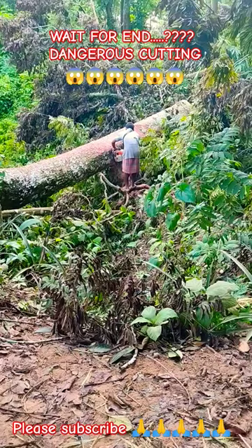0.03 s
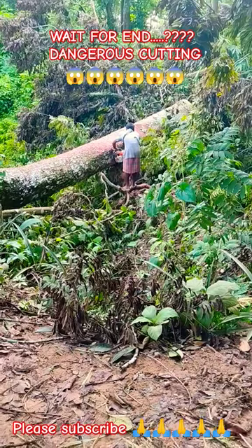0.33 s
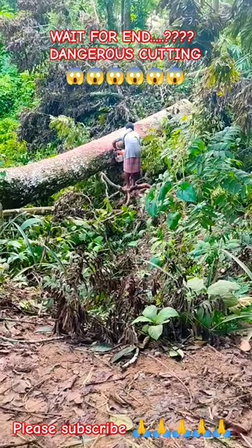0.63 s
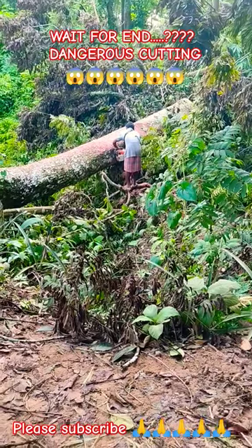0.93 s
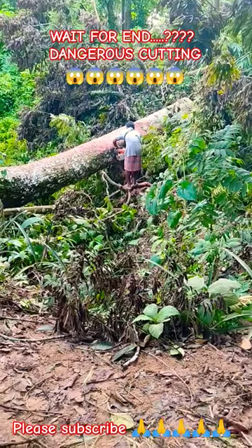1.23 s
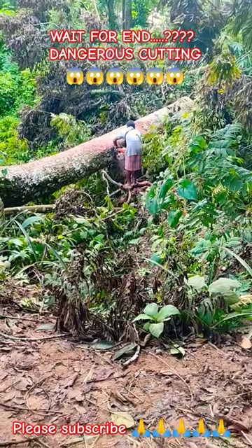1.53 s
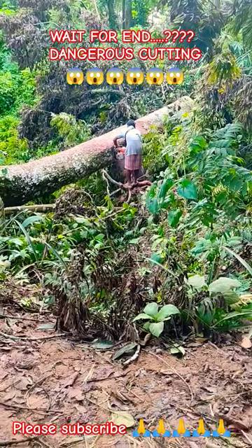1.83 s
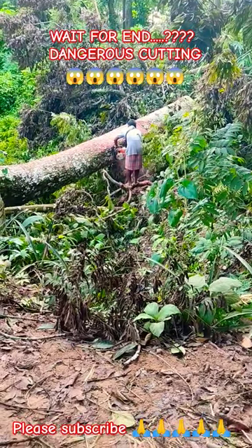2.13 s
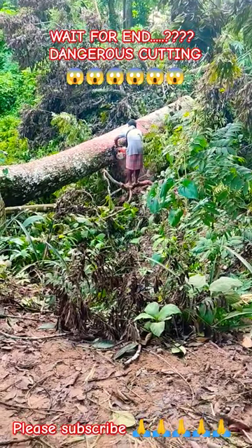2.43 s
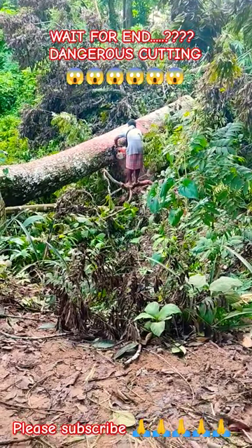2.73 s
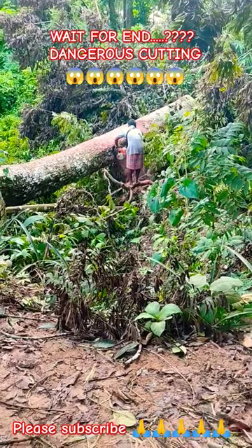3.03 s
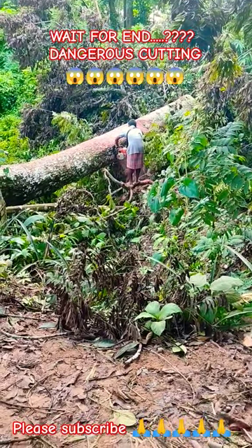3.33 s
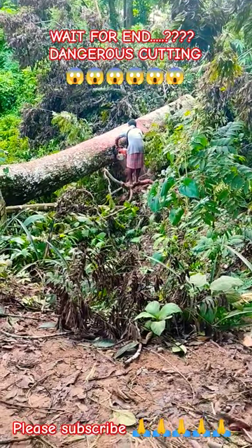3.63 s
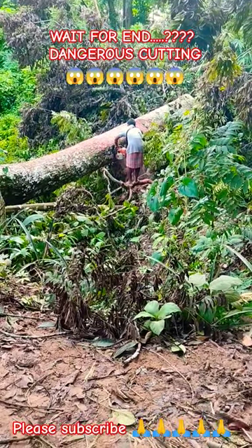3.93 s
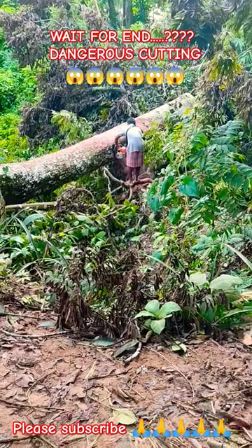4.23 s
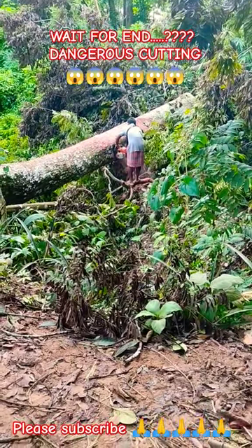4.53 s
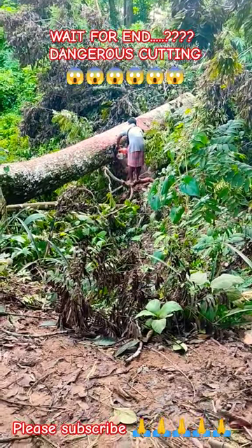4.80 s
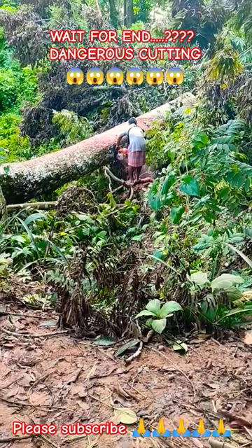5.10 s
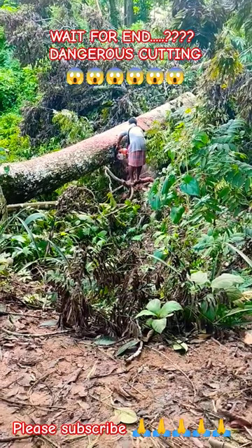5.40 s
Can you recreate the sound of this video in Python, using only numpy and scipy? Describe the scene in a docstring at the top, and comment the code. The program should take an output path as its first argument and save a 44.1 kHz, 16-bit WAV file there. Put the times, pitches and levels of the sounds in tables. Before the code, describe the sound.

A petrol chainsaw some metres away rises from a sputtering idle to a high, rasping drone as it saws through wood.

```python
"""Chainsaw cutting a fallen trunk

A two-stroke chainsaw works some metres away in thick greenery. It idles unevenly, revs up
and sinks into the wood, its speed sagging and recovering with the load. Each firing of the
engine sends out a pulse of exhaust that rings the muffler, outlet and casing. The loose clutch
jingles at idle, the chain whines, chips and cooling air hiss, and a faint rumble lies beneath."""
import sys
import numpy as np
from scipy import signal
from scipy.fft import rfft, irfft, next_fast_len
from scipy.io import wavfile
from scipy.ndimage import uniform_filter1d

SR = 44100
rng = np.random.default_rng(int(sys.argv[2]) if len(sys.argv) > 2 else 0)


def generate_wav(sig):
    """Save sig (samples, or channels by samples) to the path in sys.argv[1] as 16-bit PCM at SR."""
    pcm = np.round(np.clip(np.atleast_2d(sig).T, -1, 1) * 32767).astype(np.int16)
    wavfile.write(sys.argv[1], SR, pcm)


N = 245195
TIME = np.arange(N) / SR
FFT_SIZE = next_fast_len(N + SR // 4)
FREQ = np.maximum(np.arange(FFT_SIZE // 2 + 1) * SR / FFT_SIZE, 1)
SIDES = np.array([[1], [-1]])   # left ear, right ear; "pan" is left level minus right level

# how fast the engine fires, once per turn: t/s, rate/Hz
ENGINE_SPEED = [(0.26, 54.5), (0.63, 51.8), (0.76, 70.8), (0.88, 77.1), (1.28, 83.7), (1.38, 107.2),
                (1.54, 126.3), (1.89, 152.7), (2.02, 149.2), (2.22, 130.2), (2.31, 131.6), (2.59, 125.5),
                (2.73, 131.2), (2.94, 133.4), (3.19, 141.9), (3.44, 139.1), (3.88, 121.3), (4.04, 119.4),
                (4.21, 126.0), (4.46, 127.0), (4.75, 125.1), (5.05, 136.9), (5.25, 141.2), (5.49, 133.6)]
# how hard the saw works: t/s, throttle/0-1, bite into the wood/0-1
WORKLOAD = [(0.14, 0, 0.02), (0.64, 0.22, 0.65), (0.8, 0.22, 0.3), (1.22, 0.47, 0.26), (1.4, 0.6, 0.32),
            (1.65, 0.82, 0.17), (2.15, 0.73, 0.08), (2.62, 0.73, 0), (2.75, 0.87, 0), (3.55, 0.93, 0.1),
            (3.72, 0.78, 0.3), (4.2, 0.82, 0.62), (4.8, 0.8, 1), (4.88, 0.98, 0.12), (5.56, 1, 0.12)]
# moments when the chain snatches and rattles louder: t/s, half length/s, boost/dB
CHAIN_SNATCHES = [(0.35, 0.087, 4), (0.695, 0.035, 2.5), (1.382, 0.15, 2), (2.034, 0.12, 2.5),
                  (3.226, 0.048, 1.5)]
# tone colour of the rumbling air: f/Hz, level/dB
RUMBLE_COLOUR = [(20, -4), (45, -25), (90, 0.5), (200, -3.5), (600, -20), (2000, -90)]
# tone colour of the chain and chip hiss: f/Hz, level/dB
HISS_COLOUR = [(120, -5), (300, -5.5), (600, -2), (1000, 2), (1150, 1), (1650, 3), (2500, 4.5), (3600, 3),
               (5300, 1), (7500, 0), (9800, -0.5), (11500, -1.5), (13300, -7), (15500, -10)]
# how alike the hiss is in both ears: f/Hz, likeness (1 or more: same, -1 or less: opposite)
HISS_LIKENESS = [(120, -1.9), (600, 1.4), (1200, -0.2), (2200, 0.1), (4000, -0.42), (8000, -0.14),
                 (14000, 0.1)]
# which side the hiss leans to: f/Hz, pan/dB
HISS_BALANCE = [(120, 8), (450, 3), (900, 17), (1450, -12), (2250, 8.5), (3300, -3), (4500, 3.5),
                (6000, -3.5), (9000, 4.5), (14000, -1.5)]
# ringing of the chain and its guide bar: f/Hz, width/Hz, level against the hiss/dB, pan/dB
BAR_RINGS = [(4430, 770, -2, -9), (6190, 87, -0.5, 12), (6810, 190, -1, -13), (7526, 51, 4, -20),
             (7950, 58, -1, -25), (9700, 340, -0.5, 16), (10400, 91, -6.5, 18)]
# tones of the driven chain: multiple of the firing rate, racing level/dB, cutting level/dB, pan/dB
WHINE_TONES = [(8, -34, -33, 0), (9, -38, -36, 3), (11, -42, -28, -5), (14, -30.5, -50, -5),
               (18, -48, -25, 8)]
# ringing of the loose clutch and chain: f/Hz, width/Hz, level/dB, pan/dB
CLUTCH_RINGS = [(2195, 70, -14, 7), (2254, 45, 3, 29), (3100, 35, -15, -4)]
# ringing of the muffler (low), its outlet (middle) and the casing (high):
# f/Hz, width/Hz, idling level/dB, racing level/dB, cutting level/dB, pan/dB, left ear's lead/rad
MUFFLER_RINGS = [(140, 32, -7, -41, -32, 15, 0.76), (162, 23, -9.5, 1, -20, -13, 0.96),
                 (209.7, 7.9, 11.5, 4.5, -5, -3, 0.067), (256.4, 20, 3, -55, -24, -10, 0.13),
                 (359.8, 26.8, 0.5, 7, 8, -21, 0.7), (456.8, 40, 1.5, 5, 12, 14, -1.32),
                 (546, 28.5, -3, 3, 14.5, 0.5, -0.37), (624.7, 19.5, -29, 3, 2.5, 7, 0.45),
                 (723.6, 10.7, -10, 10.5, 11, 6, 0.57)]
OUTLET_RINGS = [(809, 23, 12, 9, 5, 1, 0.4), (843, 5.9, -8, 9, -5, -5, .5),
                (934.8, 14.2, 28.5, 19.5, 15, 1, 1.04), (987, 58, -12, 4, 5, 3, 0.86),
                (1046, 11, -35, 1, -45, 5, 1.1)]
CASING_RINGS = [(1247, 66, -22, 2, -21, 12.5, 0), (1317, 42, 1.5, -2.5, 16.5, 2.5, -1),
                (1427, 41, -14, -31, 8.5, -14, 4.5), (1410, 460, -36, 1.5, -29, -1.5, 2.2),
                (1630, 40, -24, -32, -17, 9, 3), (1808, 58, -13, 0, 12.5, -2.5, 2.5),
                (1889, 61, -12, 4, 1, -10, 1.45), (2135, 47, -3, -16, 9, 2, -1),
                (2253, 40.5, 3, 0, 10, 15.5, 1.74), (2330, 10, 12, -11, -14, 0.5, 4),
                (2650, 43, -28, -19, -22, 0, 6), (2786, 150, -16, -8.5, -21, -9, 1.2),
                (3080, 40, -6, -21, 5, 17, 1)]
# firing hum, muffler drone and outlet bark swell where a multiple of the firing rate meets a ring:
# rate/Hz, level/dB
HUM_LEVELS = [(53, -49), (60, -29), (74, -26.5), (85, -17), (105, -23), (122, -19), (135, -23), (152, -21)]
DRONE_LEVELS = [(54, -26.5), (64, -25.5), (72, -20.5), (81, -25.5), (88, -21), (104, -23.3), (120, -24.5),
                (127, -26), (134, -31.5), (141, -27), (152, -26.5)]
BARK_LEVELS = [(54, -40), (68, -39), (77.7, -22.5), (81, -32.5), (106, -19.5), (120, -22), (126.5, -26.5),
               (132, -21.5), (147, -30.5), (153, -26)]
# the hum's upper octave: rate/Hz, level against the lowest tone/dB
OCTAVE_LEVELS = [(54, -4), (66, -6), (82, -3.5), (100, -25), (120, -16.5), (130, -58), (155, -51)]


def from_db(db):
    """Turn decibels into a factor to multiply by."""
    return 10 ** (np.asarray(db) / 20)


def unit_power(x):
    """Scale a signal to an average power of 1."""
    return x / np.sqrt(np.mean(x ** 2) + 1e-20)


def over_time(table):
    """Read each column of a time table at every sample."""
    times, *columns = np.transpose(table)
    return [np.interp(TIME, times, column) for column in columns]


def over_hz(table):
    """Read a frequency table at every frequency."""
    hz, value = np.transpose(table)
    return np.interp(np.log(FREQ), np.log(hz), value)


def at_speed(table, speed):
    """Read a firing-rate table at the engine's speed."""
    return np.interp(speed, *np.transpose(table))


def filtered(x, response):
    """Strengthen or weaken each frequency of a signal."""
    return irfft(rfft(x, FFT_SIZE) * response, FFT_SIZE)[..., :N]


def resonance(hz, width):
    """The response of something that rings at one pitch, 1 at its peak."""
    return 1 / (1 + 1j * hz / width * (FREQ / hz - hz / FREQ))


def drift(rate_hz):
    """A slow random wobble, about 1 in size."""
    return unit_power(filtered(rng.standard_normal(FFT_SIZE), 1 / (1 + 1j * FREQ / rate_hz) ** 2))


def evened(x):
    """Hold the level of a stereo sound near 1 from moment to moment."""
    power = np.mean(x, axis=0) ** 2
    for _ in range(2):
        power = uniform_filter1d(power, size=2400)
    return x / np.sqrt(np.abs(power) + 1e-12)


def roughness(speed, idle_hz=52.5, hard_rev_hz_per_s=220):
    """How unevenly the fuel burns, 0-1: worst at idle and while revving up, steadiest under load."""
    _, bite = over_time(WORKLOAD)
    idling = np.exp(-np.maximum(speed - idle_hz, 0) / 7.3)
    speed_gain = uniform_filter1d(np.gradient(speed) * SR, size=3000)
    revving = np.clip(speed_gain / hard_rev_hz_per_s, 0, 1)
    return np.clip(0.21 * (1 - 0.58 * bite) + 0.73 * idling + 0.17 * revving ** 2, 0, 1)


def puff(turns, decay_turns):
    """Gas flow in each turn: the exhaust port opens at once and the pressure dies away."""
    return unit_power(np.exp(-(turns % 1) / decay_turns))


def firings(turns, spread_db):
    """One blow per engine turn, each with its own random strength."""
    at = np.flatnonzero(np.diff(np.floor(turns)) > 0)
    late = (np.ceil(turns[at]) - turns[at]) / (turns[at + 1] - turns[at])   # part of a sample
    chance = np.clip(rng.standard_normal(N)[:len(at)], -2, 1.5)
    strength = from_db(np.broadcast_to(spread_db, N)[at] * chance)
    pulses = np.zeros(N)
    pulses[at], pulses[at + 1] = strength * (1 - late), strength * late
    return unit_power(pulses)


def chain_running(speed, grip_hz=91, spread_hz=11):
    """How firmly the clutch drives the chain, 0-1: it grips as the engine speeds up."""
    return 0.5 + 0.5 * np.tanh((speed - grip_hz) / spread_hz)


def snatches_db():
    """Each snatch of the chain is a short, smooth swell in level."""
    return sum(db * np.exp(-((TIME - t) / length) ** 2) for t, length, db in CHAIN_SNATCHES)


def air_rumble(level_db=-44):
    """Moving air makes a faint low rumble, nearly the same in both ears."""
    noise = rng.standard_normal(N) + 0.14 * rng.standard_normal((2, N))
    return from_db(level_db) * unit_power(filtered(noise, from_db(over_hz(RUMBLE_COLOUR))))


def foliage_echoes(x, echo_db=-19, count=12):
    """Leaves, trunk and ground send back faint, quick echoes, different ones to each ear."""
    out = x.copy()
    for ear in range(2):
        for lag in (rng.uniform(0.002, 0.028, count) * SR).astype(int):
            out[ear, lag:] += rng.choice([-1, 1]) * from_db(echo_db) * x[ear, :-lag]
    return out / np.sqrt(1 + count * from_db(echo_db) ** 2)


def trunk_echo(x, delay_s=0.0029, share=0.46):
    """Bounces between saw and trunk smear each pulse in time without changing its tone colour."""
    delay = np.exp(-2j * np.pi * FREQ * delay_s)
    return filtered(x, (share + delay) / (1 + share * delay))


def clutch_jingle(turns):
    """Every turn knocks the loose clutch, now hard, now barely; the throttle draws it tight."""
    throttle, _ = over_time(WORKLOAD)
    knocks = firings(turns, spread_db=6)
    metal = sum(from_db(db + SIDES * pan / 2) * resonance(hz, width)
                for hz, width, db, pan in CLUTCH_RINGS)
    return from_db(-31) * (1 - throttle) ** 2 * unit_power(filtered(knocks, metal))


def chain_whine(turns, speed, flutter_depth=0.4, flutter_hz=9, throttle_rise_db=22):
    """The chain runs in step with the engine; its tones flutter, and their mix shifts as it bites."""
    throttle, bite = over_time(WORKLOAD)
    whine = 0
    for multiple, race_db, cut_db, pan in WHINE_TONES:
        flutter = 1 + flutter_depth * (drift(flutter_hz) + 1j * drift(flutter_hz))
        tone = np.real(flutter * np.exp(2j * np.pi * multiple * turns))
        strength = from_db(race_db) * (1 - bite) + from_db(cut_db) * bite
        whine = whine + tone * strength * from_db(SIDES * pan / 2)
    return whine * chain_running(speed) * from_db(throttle_rise_db * (throttle - 1.5))


def chain_hiss(turns, speed, rough, throb=0.32, flicker_db=0.95, wander_db=2.0):
    """Countless tiny hits of teeth and chips hiss, ring the bar and surge with each firing."""
    shared, opposed = rng.standard_normal((2, N))
    alike = np.clip(over_hz(HISS_LIKENESS), -1, 1)
    colour = from_db(over_hz(HISS_COLOUR) + SIDES * over_hz(HISS_BALANCE) / 2)
    hiss = filtered(shared, colour * np.sqrt(1 + alike))
    hiss += SIDES * filtered(opposed, colour * np.sqrt(1 - alike))
    for hz, width, db, pan in BAR_RINGS:
        # the rings come and go as the chain shifts
        taps = rng.standard_normal(N) * from_db(wander_db * drift(2.6))
        hiss += from_db(db + SIDES * pan / 2) * filtered(taps, resonance(hz, width))
    treble = filtered(hiss.mean(axis=0), (FREQ > 3000) & (FREQ < 12000))
    treble_db = -34 + 4.5 * chain_running(speed) + snatches_db() + flicker_db * drift(24)
    surge = 1 + throb * rough * (puff(turns, decay_turns=0.48) - 1)
    return hiss / np.std(treble) * surge * from_db(treble_db)


def ringing_part(drive, rings, band_hz):
    """Pulses ring one part of the saw; the load changes its mix of pitches, at a steady level."""
    throttle, bite = over_time(WORKLOAD)
    shares = np.array([1 - throttle, throttle * (1 - bite), throttle * bite])   # idle, race, cut
    drives = rfft(drive * shares, FFT_SIZE)
    spectrum = 0
    for hz, width, idle_db, race_db, cut_db, pan, lead in rings:
        ears = from_db(SIDES * pan / 2) * np.exp(0.5j * SIDES * lead)
        mixed_drive = from_db([idle_db, race_db, cut_db]) @ drives
        spectrum = spectrum + ears * mixed_drive * resonance(hz, width)
    band = signal.butter(4, band_hz, "band", fs=SR, output="sos")
    return evened(signal.sosfilt(band, irfft(spectrum, FFT_SIZE)[:, :N]))


def firing_hum(turns, speed):
    """The smooth part of the pulsing gas flow hums at the firing rate and an octave above."""
    lowest = np.cos(2 * np.pi * (turns + 0.28) + 0.059 * SIDES)
    octave = from_db(at_speed(OCTAVE_LEVELS, speed)) * np.cos(2 * np.pi * (2 * turns + 0.35))
    return np.sqrt(2) * (lowest + octave) * from_db(at_speed(HUM_LEVELS, speed) - 0.5 * SIDES)


def exhaust(turns, speed, rough, usual_throttle=0.85, flicker_db=1.77):
    """Over the hum, pulses and swirling gas make the muffler drone, outlet bark and casing rasp."""
    throttle, bite = over_time(WORKLOAD)
    running = chain_running(speed)
    pulses = trunk_echo(firings(turns, spread_db=2.2 * rough))
    gas = puff(turns, decay_turns=0.41) * rng.standard_normal(N)
    drone = ringing_part(pulses + 0.48 * rough * gas, MUFFLER_RINGS, band_hz=(126, 729))
    bark = ringing_part(pulses + 1.15 * rough * gas, OUTLET_RINGS, band_hz=(694, 1059))
    rasp = ringing_part(pulses + (0.15 + 1.9 * rough) * gas, CASING_RINGS, band_hz=(1130, 3350))
    lows = firing_hum(turns, speed) + drone * from_db(at_speed(DRONE_LEVELS, speed))
    # with the chain running, more throttle shifts power from the lows to the bark
    push = running * (throttle - usual_throttle)
    bark_db = at_speed(BARK_LEVELS, speed) + 19 * push
    rasp_db = -34.5 + 4 * running + 2 * bite + 0.17 * snatches_db() + flicker_db * drift(8.3)
    return lows * from_db(-3 * push) + bark * from_db(bark_db) + rasp * from_db(rasp_db)


def scene():
    """The engine's turning drives every part of the saw; it wavers when the fuel burns unevenly."""
    speed, = over_time(ENGINE_SPEED)
    rough = roughness(speed)
    turns = np.cumsum(speed) / SR + 0.018 * rough * drift(30.3)
    engine = exhaust(turns, speed, rough) + clutch_jingle(turns)
    hiss = foliage_echoes(chain_hiss(turns, speed, rough))
    return air_rumble() + chain_whine(turns, speed) + hiss + engine


def record(dry, start_s=0.1315, fade_s=0.006, cutoff_hz=15500):
    """The sound starts suddenly, and its highest treble is cut off."""
    fade_in = np.clip((TIME - start_s) / fade_s, 0, 1)
    return filtered(dry * fade_in, 1 / np.sqrt(1 + (FREQ / cutoff_hz) ** 300))


dry = scene()
out = record(dry)
generate_wav(out)
```